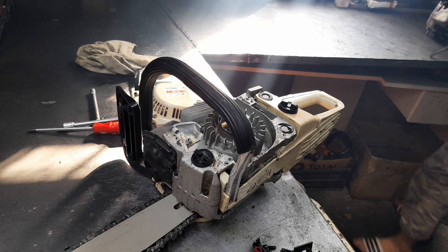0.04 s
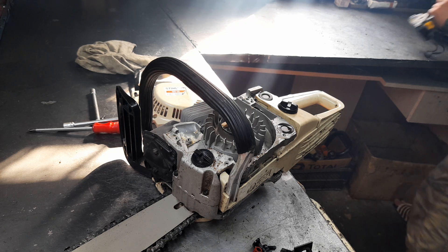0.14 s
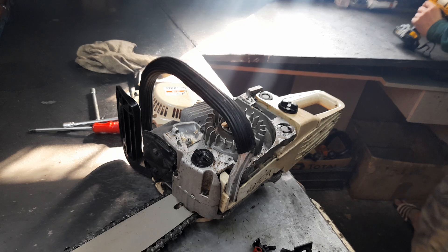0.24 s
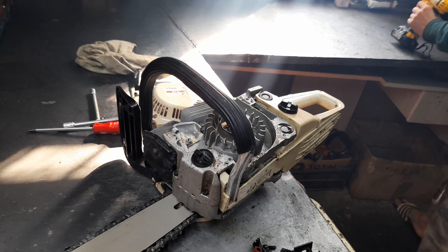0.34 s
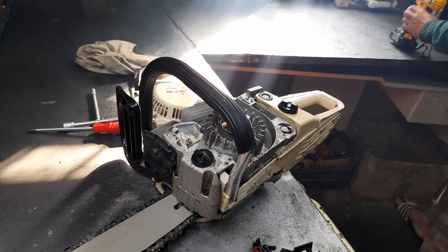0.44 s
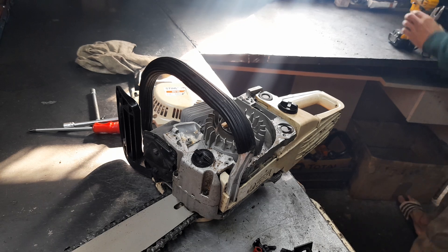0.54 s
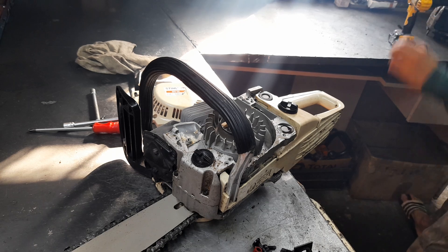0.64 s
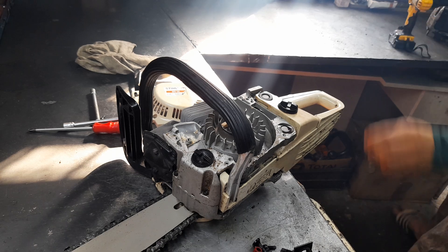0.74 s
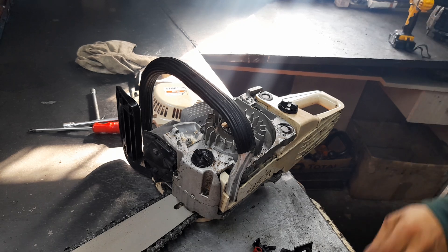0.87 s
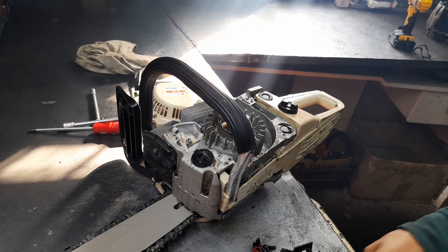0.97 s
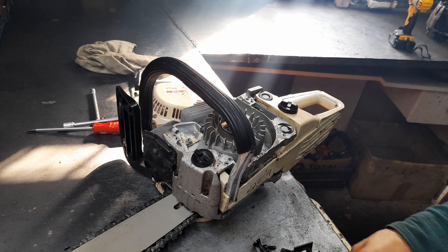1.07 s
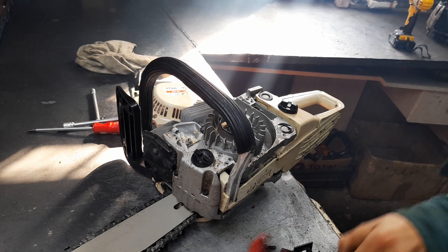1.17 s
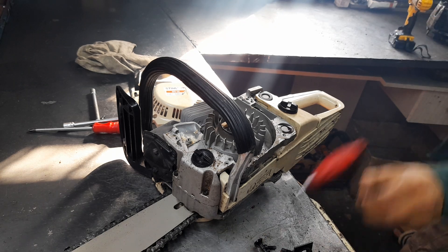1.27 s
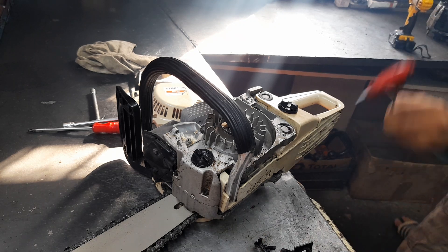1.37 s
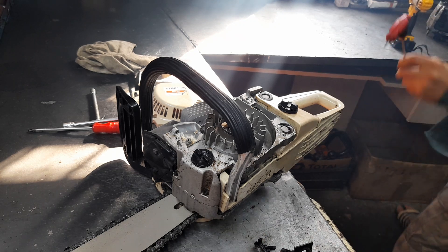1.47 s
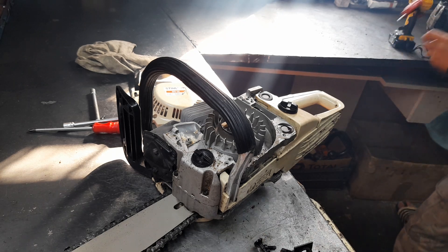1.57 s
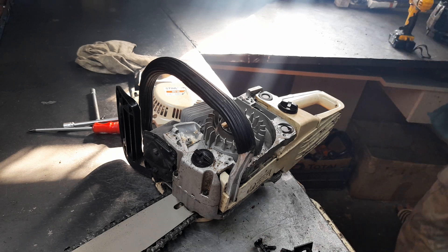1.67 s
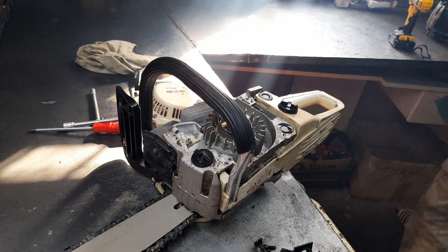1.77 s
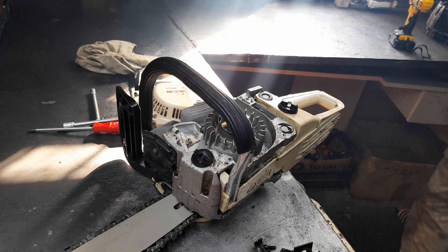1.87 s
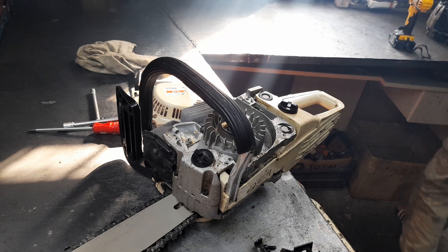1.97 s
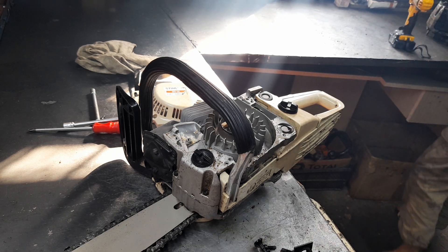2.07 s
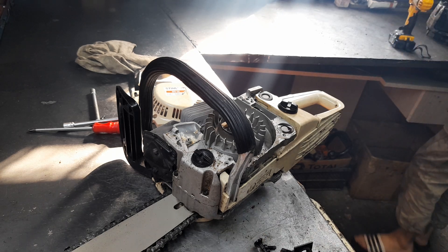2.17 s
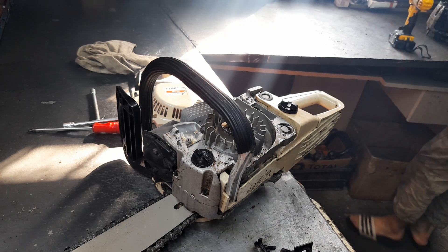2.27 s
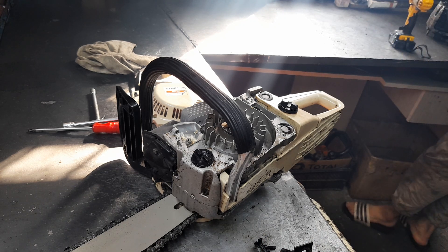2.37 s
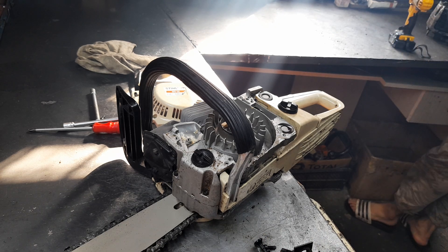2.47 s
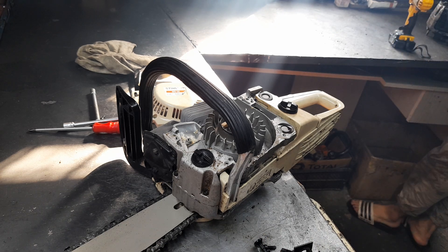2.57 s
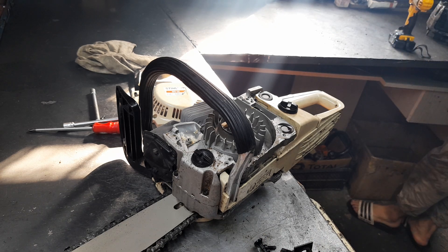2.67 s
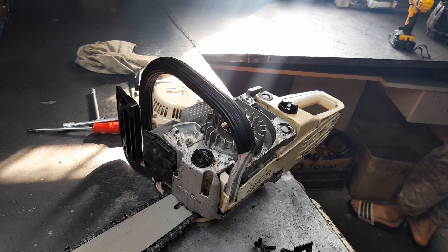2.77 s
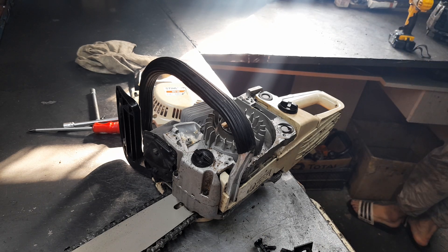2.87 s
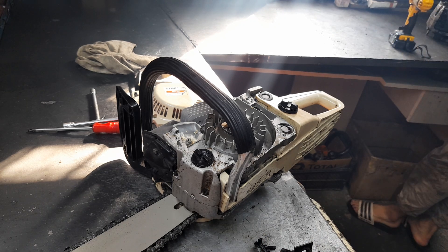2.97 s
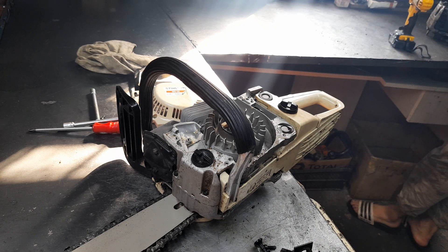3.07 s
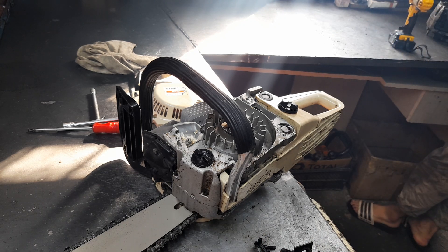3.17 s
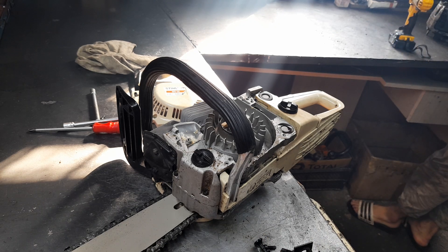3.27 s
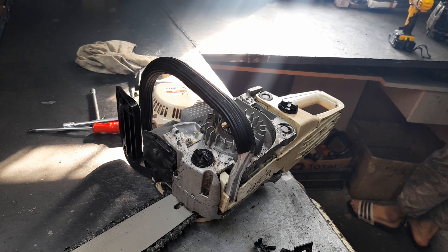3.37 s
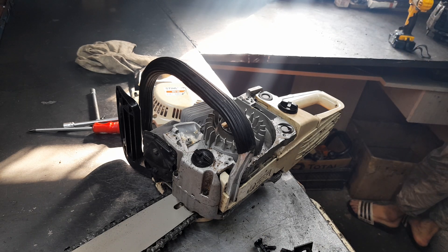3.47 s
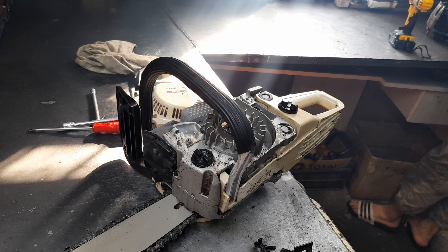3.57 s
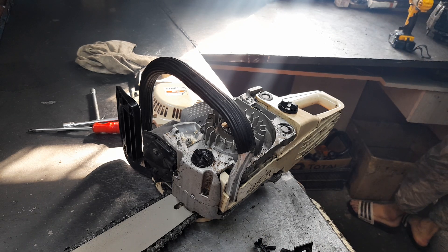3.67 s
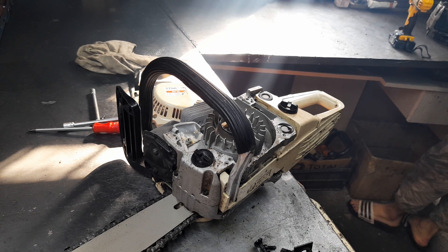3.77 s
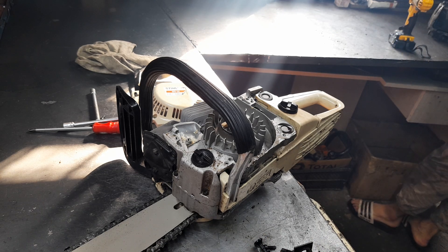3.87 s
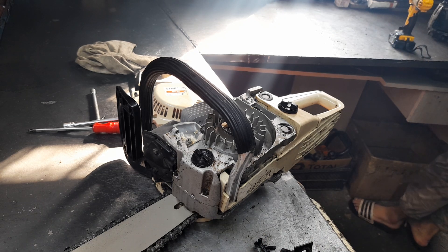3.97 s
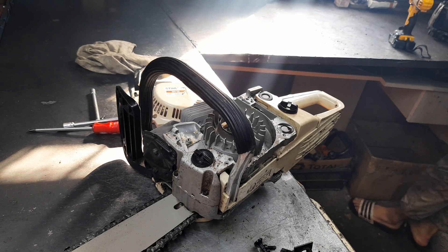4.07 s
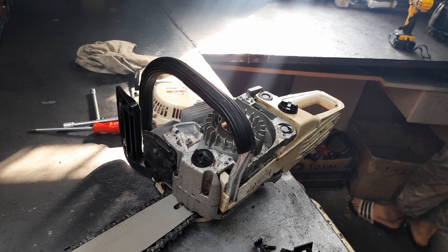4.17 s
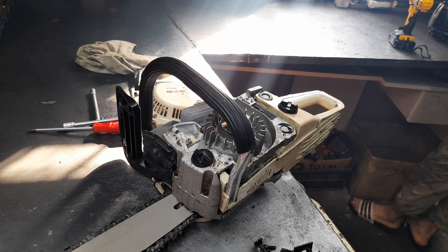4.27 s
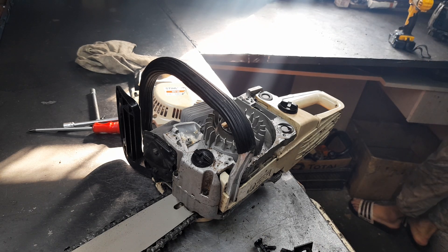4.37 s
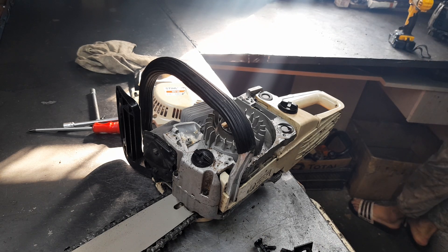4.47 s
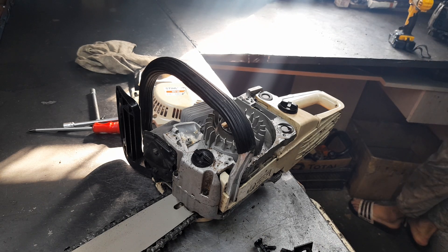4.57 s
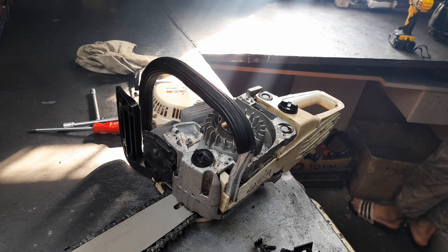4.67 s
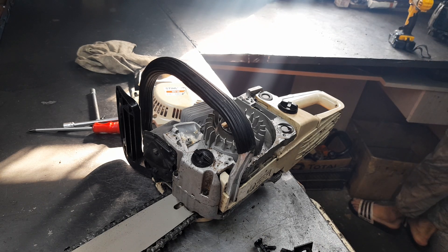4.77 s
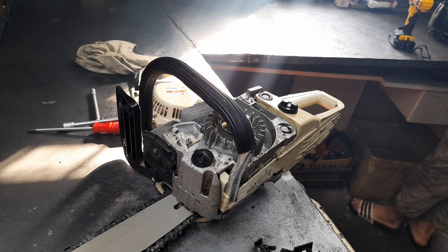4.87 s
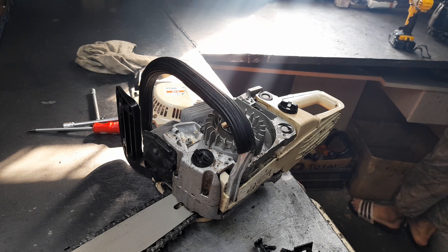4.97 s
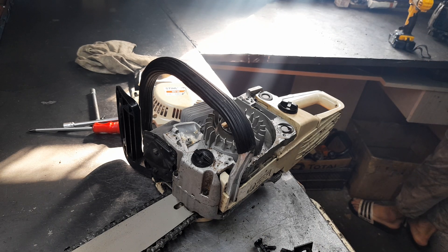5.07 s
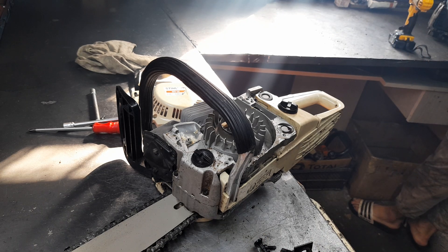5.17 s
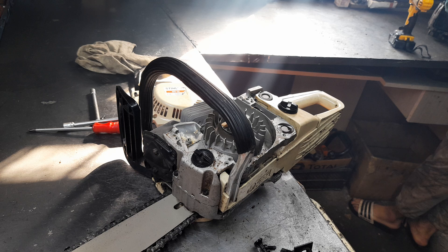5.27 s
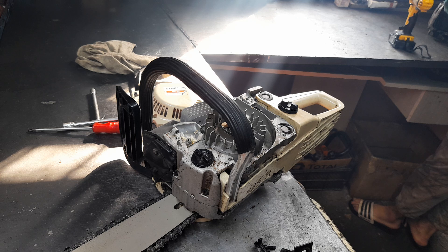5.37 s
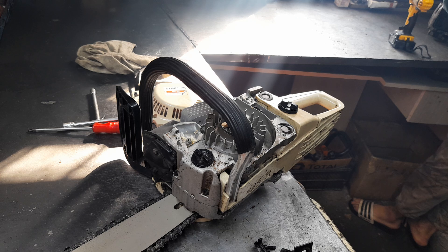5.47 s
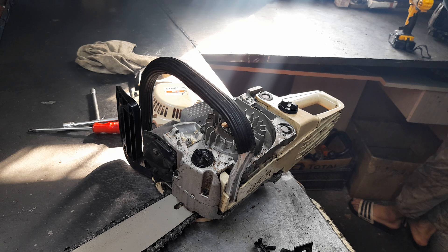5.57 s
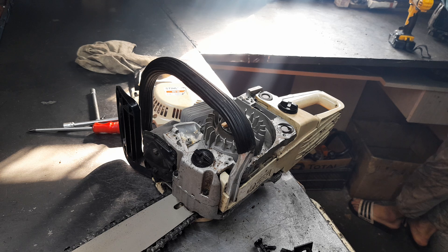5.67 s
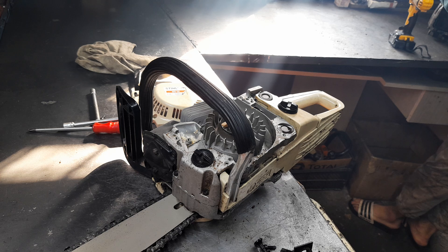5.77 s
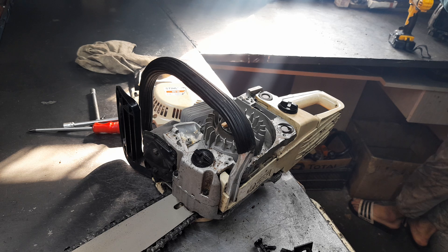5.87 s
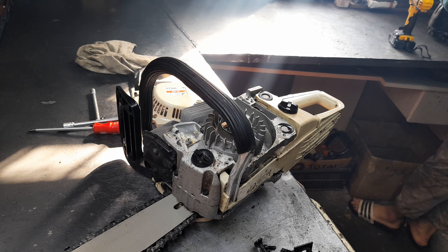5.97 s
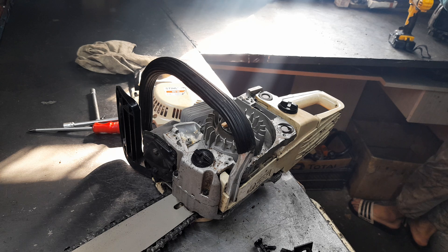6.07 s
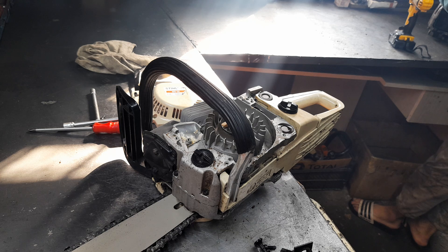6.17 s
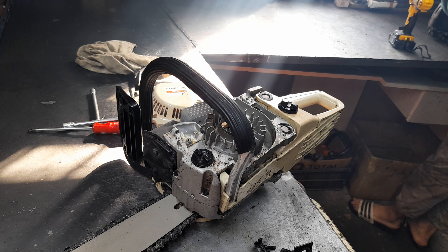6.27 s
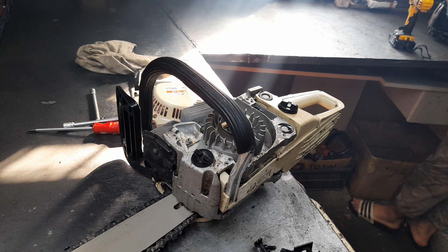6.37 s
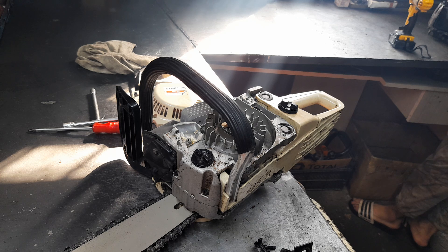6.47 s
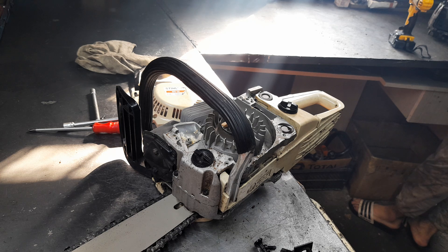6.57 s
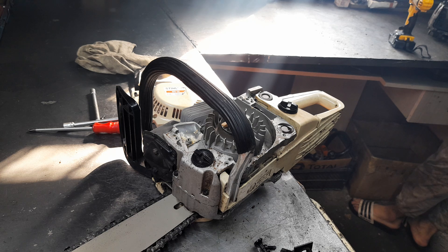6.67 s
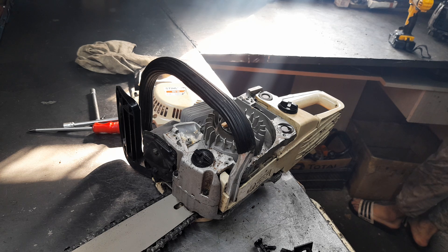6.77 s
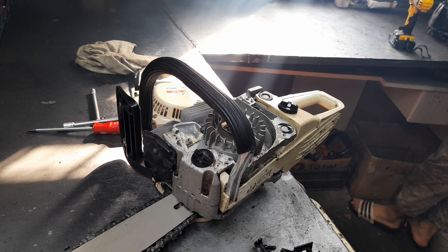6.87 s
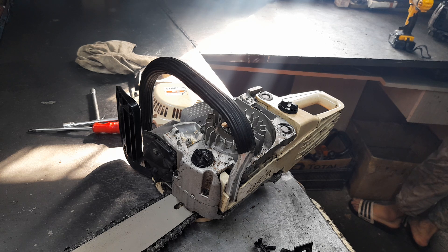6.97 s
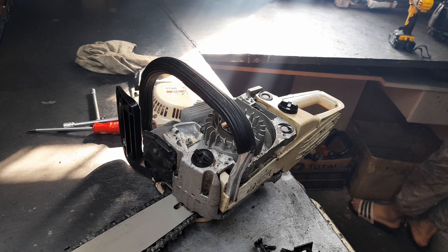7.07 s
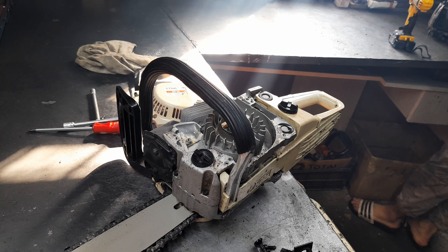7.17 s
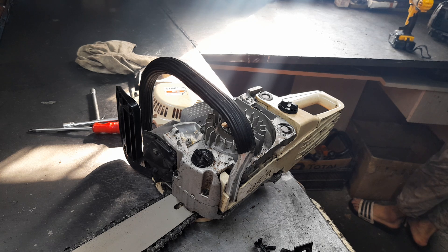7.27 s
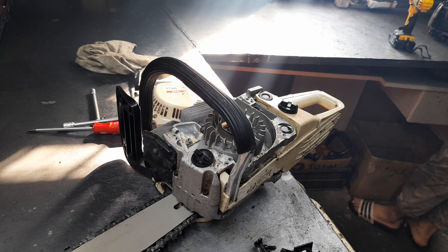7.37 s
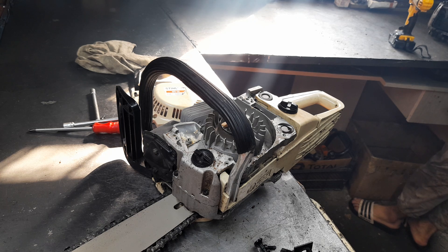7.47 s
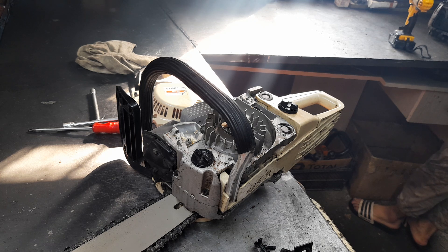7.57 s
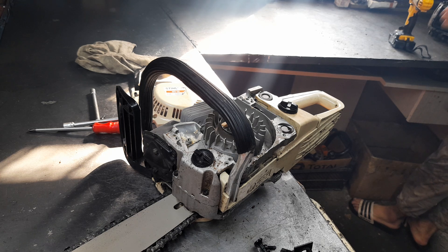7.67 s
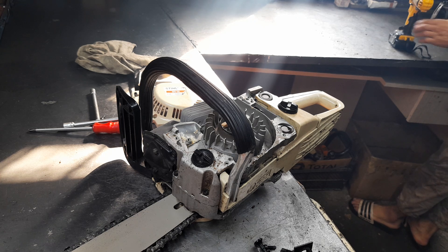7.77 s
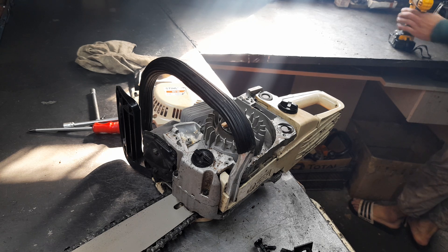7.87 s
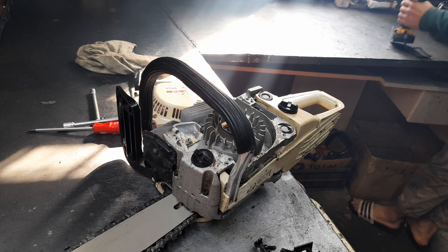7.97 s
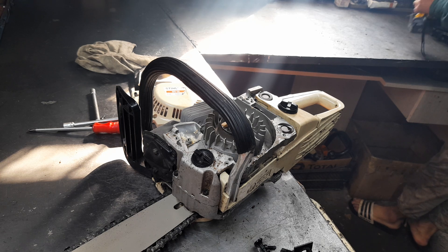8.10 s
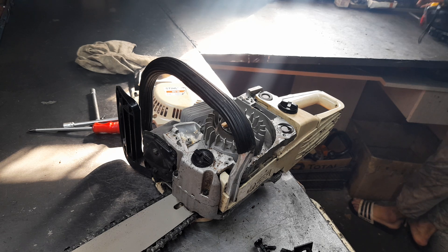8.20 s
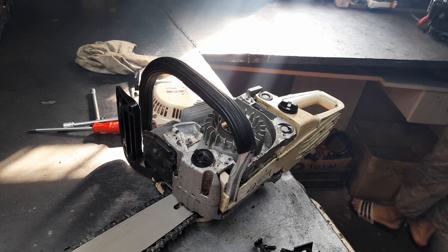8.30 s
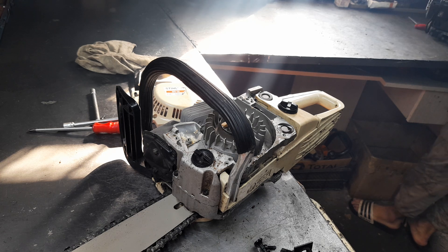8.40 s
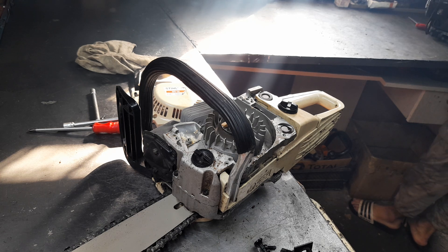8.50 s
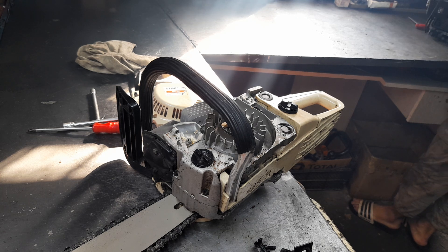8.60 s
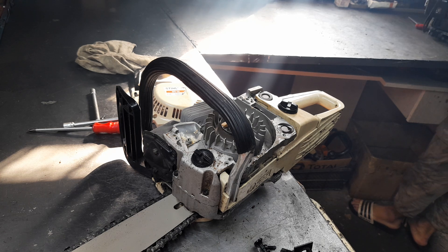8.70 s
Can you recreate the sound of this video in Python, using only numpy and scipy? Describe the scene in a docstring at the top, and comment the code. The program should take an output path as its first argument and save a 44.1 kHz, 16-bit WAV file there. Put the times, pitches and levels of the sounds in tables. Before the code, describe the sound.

A small, hard-walled workshop, heard close in stereo from a workbench, over low rumble, faint hiss, hum and a very faint far drone. At 0 s a drill's rubber foot scrapes in two short strokes, then thumps onto the bench at about 0.27 s with a deep, beating boom and a lesser knock at 0.31. Soft bumps and cloth follow; around 1.05 s a hand brushes the bench with dull little clicks. From 1.9 to 2.5 s soles shuffle, with two tiny falling squeaks, then light ticks near 2.6. A sharp, bright snap comes at 3.84 s, with a dull bump just after. Faint hollow taps fall at 5.3, 6.0 and 6.6 s, with a barely audible hoot at 5.8. Another ringing click sounds at 7.23 s, dull bumps near 7.65, then the drill knocks at 8.1 and clatters until a bright, hard knock at 8.45.

```python
"""A small, hard-walled workshop, heard by a stereo microphone at a workbench.
Close by, a cordless drill is pushed over the bench and stood with a thump; someone steps away, shuffles,
crouches and handles something that clicks sharply. At the end the drill clatters as it is picked up.
Blows are noise reflections shaped by resonances, with decaying sines for their deep booms and ringing parts;
strokes are patchy noise under a pressure curve. Low rumble, hiss, hum and a far drone lie behind it all."""
import sys
import numpy as np
from scipy import signal
from scipy.fft import rfft, irfft
from scipy.io import wavfile
from scipy.ndimage import uniform_filter1d, map_coordinates

SR = 44100
rng = np.random.default_rng(int(sys.argv[2]) if len(sys.argv) > 2 else 0)


def int16_out(signal):
    """Quantize to a 16-bit WAV file."""
    q = np.round(np.clip(np.atleast_2d(signal).T, -1, 1) * 32767)
    wavfile.write(sys.argv[1], SR, q.astype(np.int16))


N = 385434


def gain_of(db):
    """Decibels to gain."""
    return 10 ** (np.asarray(db) / 20)


def evened(x):
    """Scales to an rms of one."""
    return x / np.sqrt(np.mean(x ** 2) + 1e-20)


def read(points, hz):
    """Reads a curve of (frequency, value) points on a log-frequency axis."""
    f, value = np.transpose(points)
    return np.interp(np.log(hz + 1), np.log(f + 1), value)


def add(mix, s, sound):
    """Mixes a stereo sound in at time s."""
    part = mix[:, max(round(s * SR), 0):][:, :sound.shape[1]]
    part += sound[:, :part.shape[1]]


def panned(sound, pan_db):
    """Raises the left side by pan_db and lowers the right by as much; negative leans right."""
    return sound * gain_of([[pan_db], [-pan_db]])


def wander(size, rate):
    """Smooth chance of rms one, changing about rate times a second."""
    t = np.arange(size) / SR
    return evened(np.interp(t * rate, np.arange(4096), rng.standard_normal(4096)))


# likeness of left and right in sound from all sides: (frequency [Hz], likeness [0-1])
LIKENESS = [(60, 0.98), (150, .9), (280, 0.6), (500, 0.3), (1000, 0.0085)]


def diffuse(size, colour=None):
    """Noise from all sides: alike at both microphone ports in the bass, unrelated in the treble."""
    hz = np.fft.rfftfreq(size, 1 / SR)
    left, other = rfft(rng.standard_normal((2, size)))
    same = np.clip(read(LIKENESS, hz), -1, 1)
    spectrum = np.array([left, same * left + np.sqrt(1 - same ** 2) * other])
    if colour is not None:
        spectrum = spectrum * gain_of(read(colour, hz))
    return evened(irfft(spectrum, size))


def patchy(x, depth_db, span_hz, span_s):
    """Resonances come and go: smooth random patches over time and frequency."""
    hz, when, z = signal.stft(x, SR, nperseg=1024, noverlap=768)
    where = np.meshgrid(hz / max(span_hz, 50), when / max(span_s, .015), indexing="ij")
    field = map_coordinates(rng.standard_normal((450, 600)), where, order=1, mode="nearest")
    return evened(signal.istft(z * gain_of(depth_db * field), SR, nperseg=1024, noverlap=768)[1][:, :N])


# still air of the workshop: (frequency [Hz], level per Hz [dB], relative)
AIR = [(12, -36.5), (20, -4.5), (98, -3), (127, -19.5), (228, -26), (377, -22), (642, -30.5), (759, -29),
       (976, -32.5), (2320, -37), (3440, -42), (13500, -46.5), (16000, -50)]
# distant machine: (frequency [Hz], rms level before panning [dB])
HUM = [(53.8, -67), (91.5, -66.5)]


def air(hush_db=-56.5, pan_db=-1.1, drone_hz=395, drone_db=-86):
    """Low rumble and faint hiss, with a wavering hum and a far drone that comes and goes."""
    t = np.arange(N) / SR
    hum = np.zeros(N)
    for hz, db in HUM:
        hum += gain_of(db) * np.sqrt(2) * np.sin(2 * np.pi * hz * t + 1.1 * wander(N, 12.0))
    drone_level = gain_of(drone_db + 2.1 * wander(N, 2.0))
    drone = drone_level * np.sin(2 * np.pi * drone_hz * t + 2.0 * wander(N, 2.7))
    hush = gain_of(hush_db) * patchy(diffuse(N, AIR), depth_db=4.0, span_hz=78.4, span_s=0.079)
    return panned(hush + hum + drone, pan_db)


def pressure(strokes, attack_share, release_s):
    """Each stroke takes hold over a share of its length, swells or eases, then dies by 60 dB over the release."""
    t, level = np.arange(N) / SR, np.zeros(N)
    for start, length, db, swell in strokes:
        held, after = np.clip(t - start, 0, length), np.maximum(t - start - length, 0)
        grip = np.minimum(held / (attack_share * length), 1)
        level = np.maximum(level, grip * gain_of(db + swell * held - 60 * after / release_s))
    return level


def rubbing(level, colour, grain_db, patchy_db):
    """Many tiny slips, blurred together in patches, following the pressure of the stroke."""
    slips = patchy(diffuse(N, colour), patchy_db, span_hz=238, span_s=.04)
    return level * evened(slips * gain_of(grain_db * wander(N, 260)))


# the drill's foot pushed over the bench, close:
# (start [s], length [s], level before the scrape and judder gains [dB], swell [dB/s])
DRAG = [(0, 0.08, -39, -105), (0.085, 0.081, -46, 95)]
# spectrum of its scraping: (frequency [Hz], level per Hz [dB], relative)
DRAG_COLOUR = [(150, -60), (250, -30.5), (501, -12.5), (566, 1), (748, -12.5), (1160, -9), (3400, -16.5),
               (5540, -17), (14200, -31), (16000, -31)]


def drag(judder_hz=590, waver=0.032, scrape_db=3.5, judder_db=-15):
    """The rubber foot sticks and slips: a faint, rough note inside the scraping."""
    level = pressure(DRAG, attack_share=0.0065, release_s=0.26)
    turns = np.cumsum(judder_hz * (1 + waver * wander(N, 130))) / SR
    note = np.zeros((2, N))
    for k in range(1, 4):
        note += np.sin(2 * np.pi * k * turns + rng.uniform(0, 2 * np.pi, (2, 1))) / k ** 1.4
    judder = level * evened(note * gain_of(8.6 * wander(N, 45)))
    scrape = rubbing(level, DRAG_COLOUR, grain_db=0.0, patchy_db=2.5)
    return scrape * gain_of(scrape_db) + judder * gain_of(judder_db)


# hand and soles sliding, a row a stroke: (start [s], length [s], level before level_db and pan [dB], swell [dB/s])
SCUFFS = [(1.041, 0.096, -36.5, -105), (1.862, 0.37, -48, -16), (2.325, 0.12, -47, -15)]
# one spectrum for each stroke: (frequency [Hz], level per Hz [dB], relative)
SCUFF_COLOURS = [
    [(60, -14), (150, -12.5), (300, 2), (850, -7), (1300, -25.5), (16000, -37)],
    [(28, -16), (44, 16.5), (62, -1.5), (120, -43), (380, -10), (1940, -9), (12200, -21.5), (16000, -25)],
    [(120, -54), (366, -10), (1000, -12), (2090, -1), (2500, -4), (16000, -22)],
]
# sleeves and trousers stirring: (start [s], length [s], level above the rest level, before pan [dB], swell [dB/s])
RUSTLE = [(0.874, 0.081, -48, -63), (0.96, 0.077, -61, 8), (3.5, 0.19, -65.5, -10), (4.16, 0.17, -63, -30),
          (6.75, 0.088, -68, 7.5), (6.99, 0.14, -69.5, -16)]
# spectrum of the cloth: (frequency [Hz], level per Hz [dB], relative)
RUSTLE_COLOUR = [(150, -4.5), (500, 3), (1000, -4), (2500, -5), (6000, -13.5), (12000, -17), (16000, -20)]


def scuffs(level_db=2.5, pan_db=-0.85, rest_db=-81):
    """A hand brushes the bench, soles shuffle as the worker crouches, and clothes keep stirring faintly."""
    strokes = np.zeros((2, N))
    for row, colour in zip(SCUFFS, SCUFF_COLOURS):
        level = pressure([row], attack_share=0.22, release_s=0.31)
        strokes += rubbing(level, colour, grain_db=1.0, patchy_db=3.0)
    # clothes are never quite still
    stirring = pressure(RUSTLE, attack_share=0.12, release_s=0.25) + gain_of(rest_db)
    cloth = rubbing(stirring, RUSTLE_COLOUR, grain_db=1.0, patchy_db=3.0)
    return panned(strokes * gain_of(level_db) + cloth, pan_db)


def causal(db, size=4096):
    """The shortest (minimum-phase) impulse response with this spectrum, of energy one."""
    log_gain = np.r_[db, db[-2:0:-1]] * np.log(10) / 20
    taps = np.fft.ifft(np.exp(np.conj(signal.hilbert(log_gain)))).real[:size]
    return taps / np.linalg.norm(taps)


# decay time of the workshop, scaled by each source's ring: (frequency [Hz], time to fall 60 dB [s])
ROOM = [(100, 0.36), (300, 0.56), (660, 0.36), (1740, 0.26), (4600, 0.26), (12000, 0.21)]


def room(rise, direct, ring, late_db, early=1.2, size=32768):
    """One contact and its reflections: strong early ones, then a dense tail dying band by band."""
    t = np.arange(size) / SR
    hz, when, z = signal.stft(diffuse(size), SR, nperseg=256)
    fade = gain_of(-60 * when / (ring * read(ROOM, hz)[:, None]))
    fade = fade + gain_of(late_db - 60 * when / 0.52)  # a weaker tail, alike in every band
    tail = signal.istft(z * fade, SR, nperseg=256)[1][:, :size]
    walls = rng.choice([-1, 1], (2, size)) * (rng.random((2, size)) < 2500 / SR)  # echoes per second
    # long waves reach both ports alike
    walls = walls - .8 * uniform_filter1d(walls * 1., 60) + .8 * uniform_filter1d(walls[:1] * 1., 60)
    build_up = 1 - np.exp(-t / max(rise, 1 / SR))
    tail = (tail + 2 * early * walls * np.exp(-t / .028)) * build_up
    crack = direct * np.exp(-rise / 0.0019)  # soft landings have no sharp front
    tail[[0, 1], [8, 0]] += crack  # the straight path reaches the right port first
    return tail


def hollows(hz, depth=0.3, spacing_hz=260):
    """Overlapping high modes cancel here and there, cutting narrow gaps (dB) in the treble of a blow."""
    real, imag = (np.interp(hz / spacing_hz, np.arange(128), part) for part in rng.standard_normal((2, 128)))
    gap_db = np.minimum(10 * np.log10(real ** 2 + imag ** 2 + 1e-3), 0)
    return depth * (gap_db - gap_db.mean()) * np.interp(hz, [1800, 3500], [0, 1])


def blows(rows, colour, modes, direct, ring, late_db, pan_db, uneven_db):
    """Each blow has the same basic spectrum; where and how hard it lands tips the bass and treble."""
    out, hz = np.zeros((2, N)), np.fft.rfftfreq(8192, 1 / SR)
    body_db = read(colour, hz)
    for f, width, db in modes:
        body_db = body_db + db / (1 + (2 * (hz - f) / width) ** 2)
    body_db = body_db - 10 * np.log10(1 + (70 / (hz + 5)) ** 6)  # small things radiate no deep bass
    for s, db, thud_db, clack_db, fizz_db, rise, _ in rows:
        tip_db = read([(300, thud_db), (1200, 0), (3500, clack_db), (11000, fizz_db)], hz)
        tip_gain = np.linalg.norm(gain_of(body_db + tip_db)) / np.linalg.norm(gain_of(body_db))
        # each point of contact favours other small modes, which broaden with frequency
        spot_db = uneven_db * np.interp(2 * np.sqrt(hz), np.arange(300), rng.standard_normal(300))
        body = causal(body_db + tip_db + spot_db + hollows(hz))
        reflections = room(rise, direct, ring, late_db)
        add(out, s, gain_of(db) * tip_gain * signal.fftconvolve(reflections, body[None], axes=1))
    return panned(out, pan_db)


# drill against the bench, close: (time [s], relative level [dB], thud [dB], clack [dB], fizz [dB],
# rise [s], boom [dB]); thud, clack and fizz tip the spectrum near 300, 3500 and 11000 Hz
KNOCKS = [(0.263, -19, -8.5, 1, -5, 0.0015, -27), (0.269, -13, 2.5, -3, -8.5, 0.0087, -5.5),
          (0.312, -22, 0, 5, -3.5, 0.009, -18.5), (8.096, -14, -2.5, 1.5, 4.5, 0.0044, -26),
          (8.234, -25, 9.5, 4.5, 5.5, 0.0028, -24), (8.3405, -26, 1, -2.5, -4, 0.0022, -54),
          (8.384, -22.5, -2, 5, 10.5, 0.0027, -32), (8.4505, -9.5, -10, -0.5, -2.5, 0.0029, -50)]
# spectrum of a knock: (frequency [Hz], level per Hz [dB], relative)
KNOCK_COLOUR = [(50, -10), (130, 2.5), (230, -12.5), (380, -5), (910, -7), (1900, -8), (2800, -14),
                (8200, -19.5), (11800, -14), (15800, -24.5)]
# resonances of the bench: (frequency [Hz], width [Hz], boost [dB])
BENCH_MODES = [(200.4, 19, 8.5), (307.6, 36, 9), (396.5, 12, 7), (537, 51, 3.5), (1216, 39, 4),
               (1382, 70, 3), (1734, 76, 2), (2410, 90, 4), (6150, 330, 3)]


def knocks():
    """The heavy drill strikes the bench and excites the resonances of its top."""
    return blows(KNOCKS, KNOCK_COLOUR, BENCH_MODES,
                 direct=5.5, ring=0.91, late_db=-36, pan_db=-0.62, uneven_db=1.28)


# deep modes of bench and room, near enough in pitch to beat:
# (frequency [Hz], level before tilting [dB], time to fall 60 dB before the ring factor [s])
BOOM_MODES = [(46.6, -15.5, 0.25), (59.1, -3, 0.85), (68.37, 1, 0.66), (84.8, -8, 0.56), (97.2, -14, 0.65),
              (133.2, -26.5, 0.99)]


def booms(rows, lag_s, tilt_db, ring, pan_db=-2.0, ref_db=-31, deepening=0.25):
    """A moment after each blow the deep modes answer and beat; a stronger boom leans to the low modes."""
    out, t = np.zeros((2, N)), np.arange(SR) / SR
    lowest_hz = BOOM_MODES[0][0]
    for s, *_, boom_db in rows:
        lean_db = tilt_db - deepening * (boom_db - ref_db)  # per octave
        swing = np.zeros(SR)
        for k, (hz, db, t60) in enumerate(BOOM_MODES):
            fading_db = db + lean_db * np.log2(hz / lowest_hz) - 60 * t / (ring * t60)
            swing += (-1) ** k * gain_of(fading_db) * np.sin(2 * np.pi * hz * t)
        add(out, s + lag_s, panned(gain_of(boom_db) * swing / abs(swing).max(), pan_db))
    return out


def deep_booms(lift_db=1.33):
    """Every kind of blow sets off the deep modes with its own lag, tilt and decay; some booms are very faint."""
    deep = (booms(KNOCKS, lag_s=0.0013, tilt_db=15.0, ring=0.83)
            + booms(CLICKS, lag_s=0.012, tilt_db=5.5, ring=1.0)
            + booms(TAPS, lag_s=0.034, tilt_db=1.0, ring=0.86)
            + booms(BUMPS, lag_s=0.017, tilt_db=-10.0, ring=0.8))
    return deep * gain_of(lift_db)


# loose parts, tools and the bench top ringing, alone or jogged by a blow:
# (time [s], frequency [Hz], width [Hz], relative level [dB])
PINGS = [(0.269, 1410, 450, -20.5), (0.275, 200, 19, -29), (2.582, 1870, 350, -50),
         (2.701, 3540, 520, -52.5), (2.719, 1078, 260, -51), (3.636, 3600, 730, -61),
         (3.65, 804, 200, -60.5), (3.837, 1540, 330, -30), (3.837, 2166, 120, -32), (3.837, 3410, 300, -33),
         (4.786, 4350, 1700, -61.5), (5.29, 1830, 200, -49), (5.29, 2740, 260, -49), (5.29, 5360, 230, -59),
         (5.994, 4200, 590, -49), (6.63, 4750, 700, -46), (7.226, 3160, 260, -31), (7.226, 3920, 300, -31),
         (7.226, 4850, 600, -28.5), (7.726, 4600, 1400, -49.5), (8.098, 1387, 190, -27),
         (8.097, 3500, 240, -36), (8.235, 1053, 34, -36.5), (8.235, 1386, 170, -34), (8.386, 1410, 60, -30),
         (8.386, 2370, 50, -37), (8.452, 876, 440, -21.5), (8.452, 6300, 280, -36)]


def pings(direct=5.4, ring=0.8, late_db=-32):
    """Loose parts ring at their own pitch; the narrower the resonance, the longer it lasts."""
    out, t = np.zeros((2, N)), np.arange(SR // 4) / SR
    for s, hz, width, db in PINGS:
        note = t * np.exp(-np.pi * width * t) * np.sin(2 * np.pi * hz * t)
        note = note / np.linalg.norm(note)
        reflections = room(0, direct, ring, late_db)
        add(out, s, gain_of(db) * signal.fftconvolve(reflections, note[None], axes=1))
    return out


# footfalls and dull bumps:
# (time [s], relative level [dB], thud [dB], clack [dB], fizz [dB], rise [s], boom [dB])
BUMPS = [(0.47, -47.5, -3, 8, 8.5, 0.01, -54), (0.655, -43.5, 5, 5.5, 10.5, 0.05, -31),
         (0.75, -44.5, 3.5, 8, 10.5, 0.11, -30), (0.985, -57, 11, -12, -12, 0.02, -46),
         (1.049, -40.5, 5.5, -21, -8, 0.0032, -44), (2.721, -42, -8.5, 5, -7, 0.0033, -31),
         (3.92, -34.5, -5.5, 4.5, 3, 0.0045, -35), (4.093, -44.5, 5.5, -3, 3, 0.012, -30),
         (6.955, -56.5, 1.5, 0, 5, 0.028, -32.5), (7.402, -41, -3, -0.5, -1.5, 0.0025, -28),
         (7.642, -31, -8, -18.5, -19, 0.0069, -33), (7.96, -45, 5, 11.5, 7.5, 0.076, -32),
         (8.598, -49.5, 10, 15, 15, 0.0018, -61)]
# spectrum of a bump: (frequency [Hz], level per Hz [dB], relative)
BUMP_COLOUR = [(50, 1.5), (130, 3.5), (230, -15.5), (380, -8.5), (600, -10), (1300, -19), (1900, -19),
               (4000, -30.5), (8200, -33.5), (14000, -34.5)]


def bumps():
    """Dull contacts, many slow to rise, share the bench's resonances and a stronger late tail."""
    return blows(BUMPS, BUMP_COLOUR, BENCH_MODES,
                 direct=4.0, ring=0.75, late_db=-13, pan_db=-0.6, uneven_db=2.0)


# small hard parts clicking and snapping:
# (time [s], relative level [dB], thud [dB], clack [dB], fizz [dB], rise [s], boom [dB])
CLICKS = [(1.072, -34.5, 8, -7.5, -6, 0.0082, -59), (1.14, -35, -2, -14.5, -10.5, 0.0021, -45.5),
          (2.583, -36, 10, 6.5, -5, 0.00065, -32.5), (3.836, -17.5, -0.5, 0.5, 0, 0.0002, -26),
          (4.786, -63.5, 0, 3.5, 6, 0.0009, -51), (7.226, -20, 6.5, 9, 2.5, 0.0015, -21.5),
          (7.684, -63, -6, 8, 1, 0.0005, -59.5), (7.727, -32.5, 13, -11.5, -18.5, 0.0034, -21.5)]
# spectrum of a click: (frequency [Hz], level per Hz [dB], relative)
CLICK_COLOUR = [(50, -10.5), (130, -2.5), (230, -18.5), (420, -19), (560, -12), (900, -13), (1700, -7.5),
                (5000, -7), (7300, -4.5), (10500, -10), (15800, -6.5)]
# resonances heard in the clicks, from the small parts and the room: (frequency [Hz], width [Hz], boost [dB])
CLICK_MODES = [(318, 40, 12), (2280, 650, 3.5), (11860, 1900, 7.5)]


def clicks():
    """Small hard parts snap: a strong direct front, a narrow low resonance near 318 Hz, broad bright ones above."""
    return blows(CLICKS, CLICK_COLOUR, CLICK_MODES,
                 direct=10.0, ring=0.97, late_db=-30.0, pan_db=-0.56, uneven_db=1.0)


def notes(rows, sag_per_s):
    """Faint, wavering notes that rise and fade, losing sag_per_s of their pitch each second."""
    out = np.zeros((2, N))
    for s, length, hz, db in rows:
        t = np.arange(round(length * SR)) / SR
        turns = np.cumsum(hz * (1 - sag_per_s * (t - length / 2))) / SR
        note = np.sin(2 * np.pi * turns + 0.65 * wander(len(t), 53) + rng.uniform(0, 2.3, (2, 1)))
        add(out, s - length / 2, gain_of(db) * np.sin(np.pi * t / length) * note)
    return out


# sole on the floor: (middle [s], length [s], frequency at the middle [Hz], peak level [dB])
SQUEAKS = [(2.175, 0.06, 690, -54), (2.47, 0.07, 508, -56.5)]


def squeaks():
    """A sole squeaks faintly as it twists on the floor, sinking in pitch."""
    return notes(SQUEAKS, sag_per_s=1.6)


# light, hollow taps on a casing:
# (time [s], relative level [dB], thud [dB], clack [dB], fizz [dB], rise [s], boom [dB])
TAPS = [(2.557, -47.5, 0, 7.5, 13, 0.0074, -64), (2.701, -51, -2, -1, -0.5, 0.0024, -57),
        (3.441, -44, -1, -6.5, -18, 0.0025, -37.5), (5.289, -36, -1.4, -2.5, 4, 0.0014, -44),
        (5.989, -37, 1.7, -2.5, 11, 0.015, -46), (6.63, -33.5, 2, 3.5, 1.5, 0.0017, -30.5)]
# spectrum of a tap: (frequency [Hz], level per Hz [dB], relative)
TAP_COLOUR = [(50, -8.5), (130, -0.5), (230, -12), (420, -7.5), (700, 0), (2500, -1), (5000, -7),
              (7300, -16), (11000, -25), (15800, -30.5)]
# resonances of the casing: (frequency [Hz], width [Hz], boost [dB]; negative for a hollow between them)
TAP_MODES = [(870, 140, 2), (1400, 170, -5.5), (1850, 240, 4), (2420, 330, 3)]


def taps():
    """Light taps excite the broad middle resonances of a hollow casing."""
    return blows(TAPS, TAP_COLOUR, TAP_MODES,
                 direct=11.0, ring=0.82, late_db=-39.5, pan_db=-1.05, uneven_db=1.6)


# a faint hoot from far away: (middle [s], length [s], frequency [Hz], peak level [dB])
HOOTS = [(5.825, 0.1, 420, -63.5)]


def hoots():
    """A brief far-off note that wavers without sinking."""
    return notes(HOOTS, sag_per_s=0)


def scene():
    """All the sources together."""
    background = air()
    strokes = drag() + scuffs()
    contacts = knocks() + deep_booms() + pings() + bumps() + clicks() + taps()
    return background + strokes + contacts + squeaks() + hoots()


def record(dry, edge_hz=15950):
    """The recorder's band limit: a steep low-pass filter."""
    band_limit = signal.firwin(301, edge_hz, window=("kaiser", 8), fs=SR)
    return signal.oaconvolve(dry, band_limit[None], "same")


dry = scene()
out = record(dry)
int16_out(out)
```